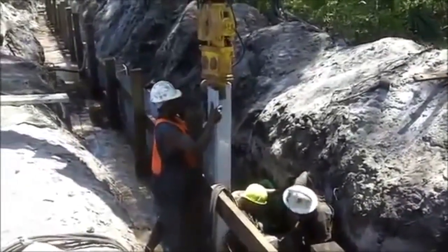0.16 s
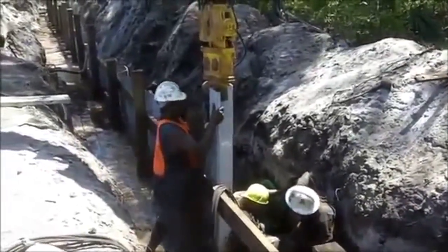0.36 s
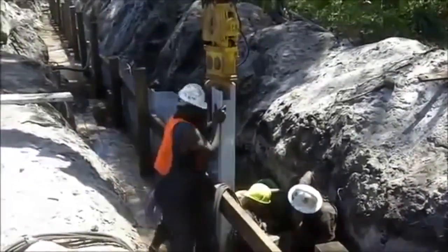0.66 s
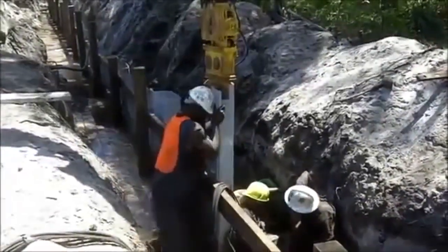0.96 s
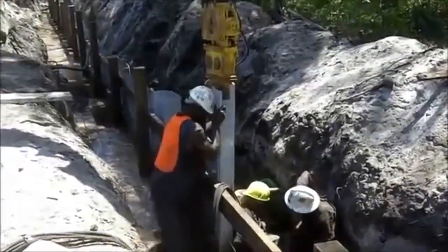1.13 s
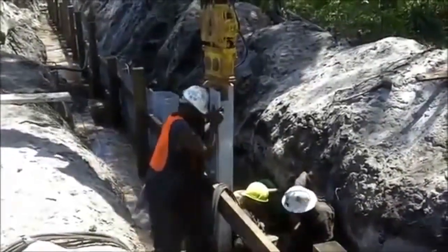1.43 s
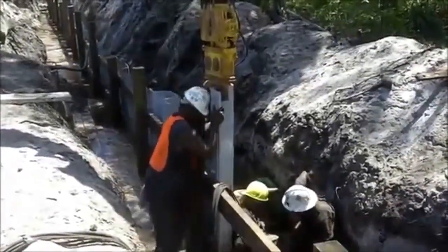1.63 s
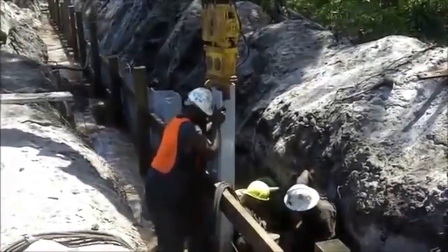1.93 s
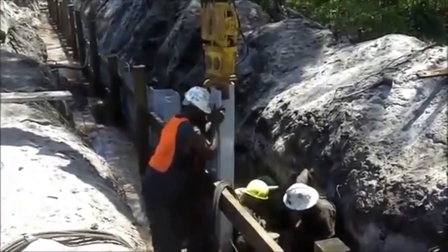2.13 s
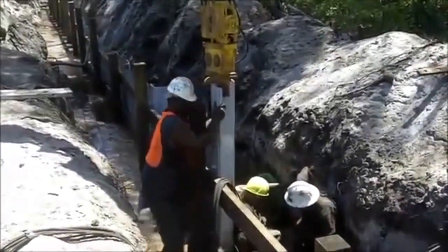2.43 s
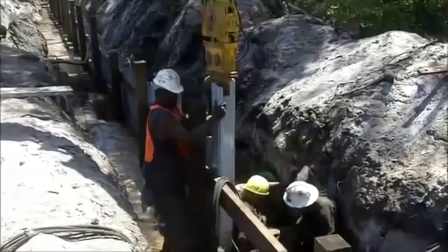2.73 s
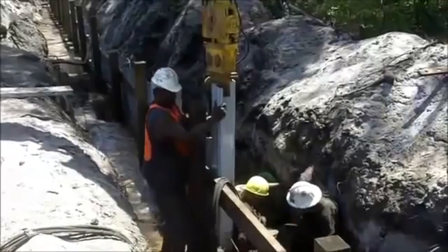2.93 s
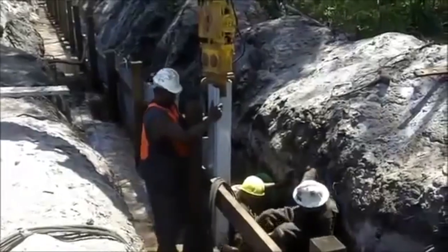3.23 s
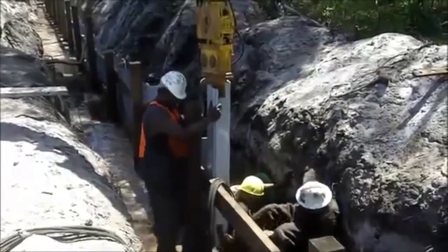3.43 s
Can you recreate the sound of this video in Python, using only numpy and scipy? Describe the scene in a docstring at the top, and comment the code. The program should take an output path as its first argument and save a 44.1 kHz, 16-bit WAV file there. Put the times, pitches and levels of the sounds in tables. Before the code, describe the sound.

A small engine chugs and clatters throughout at an outdoor building site, sagging and surging about twice a second with a louder exhaust bark. A bigger diesel drones steadily behind it with hum and fan roar. Exhaust thumps stand out near 0.7, 1.8 and 3.4 seconds, and a few harder knocks come between 1.9 and 2.6 seconds. Light metal ticks are scattered from about 0.7 to 3.1 seconds.

```python
"""A single-cylinder engine chugs and hunts beside a trench on a building site. About twice a second
it sags, its governor opens the throttle and the exhaust barks louder; piston and valve gear clatter on.
Behind it a bigger diesel drones steadily, with a machine hum, fan roar and a few light metal ticks.
Almost mono: only a faint rumble of air differs between the channels."""
import sys
import numpy as np
from scipy import signal
from scipy.fft import rfft, irfft
from scipy.io import wavfile
from scipy.ndimage import uniform_filter1d

SR = 44100
rng = np.random.default_rng(int(sys.argv[2]) if len(sys.argv) > 2 else 0)


def bounce(signal):
    """Save signal as a 16-bit WAV file at the path given by the first command-line argument."""
    frames = np.transpose(np.atleast_2d(signal))
    limited = np.clip(frames, -1, 1)
    pcm = np.round(limited * 32767).astype(np.int16)
    wavfile.write(sys.argv[1], SR, pcm)


N = 157437

FIRING_HZ, HUNT_DEPTH_HZ, HUNT_HZ, SLOWEST_S = 25.02, 1.48, 1.909, .206
# Spectrum of a piston knock. Each row: frequency in Hz, gain in dB.
KNOCK_SPECTRUM = [(300, -21.5), (520, -0.5), (700, -1.5), (880, 2), (1050, 1.5), (1450, -1.5),
                  (1850, -11.5), (3000, -21.5), (8000, -57)]


def undb(db):
    return 10 ** (np.asarray(db) / 20)


def level(x, db):
    """Set the rms level."""
    return x * undb(db) / np.sqrt(np.mean(x ** 2))


def colour(x, points):
    """Minimum-phase filter through (Hz, dB) points, falling 10 dB an octave outside them."""
    hz, db = np.array(points, float).T
    size = 2 ** 18
    bin_hz = np.maximum(np.arange(size // 2 + 1) * SR / size, 1)
    octaves_out = np.maximum(np.log2(bin_hz / hz[-1]), 0) + np.maximum(np.log2(hz[0] / bin_hz), 0)
    gain_db = np.interp(np.log(bin_hz), np.log(hz), db) - 10 * octaves_out
    cepstrum = irfft(np.log(undb(gain_db)))
    cepstrum[1:size // 2] *= 2
    cepstrum[size // 2 + 1:] = 0
    return irfft(rfft(x, size) * np.exp(rfft(cepstrum)))[:N]


def noise(spectrum):
    return colour(rng.standard_normal(N), spectrum)


def walk(rate_hz):
    """Smooth random drift with unit spread."""
    hold = int(SR / rate_hz)
    steps = np.repeat(rng.standard_normal(400), hold)[:N]
    drift = uniform_filter1d(uniform_filter1d(steps, hold), hold)
    return drift / np.std(drift)


def pulses(cycles, table, scatter_db):
    """Pressure impulses at set places in each engine cycle."""
    out = 0
    for place, _, db in table:
        cycle = (cycles - place + 2).astype(int)
        strength = undb(db + scatter_db * rng.standard_normal(200))
        out = out + np.diff(cycle, prepend=cycle[0]) * strength[cycle]
    return out


def bursts(cycles, table, scatter_db, rise_s=0.003):
    """Decaying noise bursts at set places in each engine cycle."""
    gate = 0
    for place, decay_cycles, db in table:
        since = cycles - place + 2
        strength = undb(db + scatter_db * rng.standard_normal(200))
        gate = gate + strength[since.astype(int)] * np.exp(-(since % 1) / decay_cycles)
    return uniform_filter1d(gate, int(rise_s * SR)) * rng.standard_normal(N)


def throttle(t, open_s=0.015, close_s=0.045, idle_db=-7):
    """Firing strength in dB: the governor opens fast, holds and eases back to idle."""
    # Each row: start in seconds, hold in seconds, strength in dB.
    surges = [(.19, 0.12, 0), (.68, 0.19, 0.5), (1.21, 0.24, 0), (1.72, 0.19, 1.5), (2.3, 0.11, 2.5),
              (2.75, 0.2, 0.5), (3.301, 0.2, 0.5)]
    strength = idle = undb(idle_db)
    for start_s, hold_s, db in surges:
        opening = np.clip((t - start_s) / open_s, 0, 1)
        closing = np.exp(-np.maximum(t - start_s - hold_s, 0) / close_s)
        strength = strength + (undb(db) - idle) * opening * closing
    return 20 * np.log10(strength)


def exhaust(cycles, throttle_db):
    """One pulse a cycle rings pipe and silencer; puffs of gas bark with the throttle."""
    # Pipe resonances and bark spectrum. Each row: frequency in Hz, gain in dB.
    pipe_spectrum = [(14, -16), (25, -7), (34, -27), (47, 3.5), (54, 0), (64, -9), (75, -6.5), (100, -18.5),
                     (127, -8), (160, -22.5), (200, -24.5), (245, -12.5), (315, -15), (430, -36.5),
                     (900, -47.5)]
    bark_spectrum = [(50, -17), (85, -6.5), (125, -2.5), (170, -12), (215, -1), (245, 1.5), (275, -5.5),
                     (320, 1), (348, -11.5), (375, -7), (435, -23.5), (900, -35), (4000, -64)]
    # Each row: place in the cycle (0-1), decay in cycles, gain in dB.
    puffs = [(.57, 0.06, -2), (.9, 0.15, -7), (0.3137, 0.049, -4)]
    firing = pulses(cycles, [(.55, 0, 0)], scatter_db=0.8)
    pipe = colour(firing * undb(0.091 * throttle_db), pipe_spectrum)
    pressure = level(pulses(cycles + 0.013 * walk(60), puffs, scatter_db=3.0), 0)
    turbulence = level(bursts(cycles, puffs, scatter_db=0.3), -1.5)
    bark = colour((pressure + turbulence) * undb(throttle_db), bark_spectrum)
    return level(pipe, -26.5) + level(bark, -30)


def clatter(t, cycles, throttle_db):
    """Piston, valve gear and panels knock and rattle in every cycle."""
    # Impacts. Each row: place in the cycle (0-1), decay in cycles, gain in dB.
    knock_hits = [(0.597, 0.19, 4), (0.476, 0.11, 0), (.13, 0.11, -3), (.29, 0.083, -1)]
    valve_hits = [(0.1, .12, -1), (0.518, 0.072, 0)]
    panel_hits = [(0.358, 0.074, 0.36), (0.548, 0.17, -1.3)]
    # Resonances. Each row: frequency in Hz, gain in dB.
    valve_spectrum = [(700, -13.5), (1200, 0), (1720, 1), (1860, -3), (2000, 2.5), (2170, -7), (2390, 4.5),
                      (2470, 0.5), (2560, 2.5), (2750, -1.5), (2890, -11), (3080, -1.5), (3250, -16.5),
                      (4000, -8), (7000, -32)]
    panel_spectrum = [(1500, -5.5), (2600, -1), (3800, -3), (4800, -11.5), (6700, -7), (8000, -17.5),
                      (10000, -46.5)]
    # Clatter strength. Each row: time in seconds, knock gain in dB.
    swell = [(0, 5), (.17, 0.5), (.4, -2), (.6, 3), (.8, -1), (1.1, -2), (1.4, 0), (1.55, -1), (1.65, 3.5),
             (1.9, 1), (2.05, -2), (2.27, 1.5), (2.36, 0.5), (2.48, 2.5), (2.8, 1.5), (3.0, -2), (3.15, 1),
             (3.55, 0.5)]
    swell_db = np.interp(t, *np.array(swell).T)
    knocks = bursts(cycles, knock_hits, scatter_db=1.0) * undb(swell_db)
    valves = bursts(cycles, valve_hits, scatter_db=1.9) * undb(.6 * swell_db + 0.17 * throttle_db)
    panels = bursts(cycles, panel_hits, scatter_db=2.5) * undb(0.71 * swell_db + 0.5 * throttle_db)
    return (level(colour(knocks, KNOCK_SPECTRUM), -37.5)
            + level(colour(valves, valve_spectrum), -44)
            + level(colour(panels, panel_spectrum), -50.5))


def trench(x, decay_s=0.026, echo_db=-4.5):
    """Add short scattered echoes from the earth banks."""
    t = np.arange(SR // 5) / SR
    tail = rng.standard_normal(len(t)) * np.exp(-t / decay_s) * (t > .004)
    return x + undb(echo_db) * signal.fftconvolve(x, tail / np.linalg.norm(tail))[:N]


def drone(shaft_hz, harmonics, wobble, waver_db):
    """Harmonics of a governed shaft speed, each wavering a little."""
    turns = np.cumsum(shaft_hz * (1 + wobble * walk(9))) / SR
    out = 0
    for multiple, db in harmonics:
        tone = np.sin(2 * np.pi * (multiple * turns + rng.random()))
        out = out + level(tone * undb(waver_db * walk(7.22)), db)
    return out


def steady_machines():
    """The big diesel drones and a second machine hums."""
    # Harmonics. Each row: multiple of shaft speed, level in dB.
    diesel = [(1, -39.5), (2, -32), (3, -43), (5, -37), (6, -47.5), (9, -37), (10, -48.5), (14, -42.5),
              (18, -50), (20, -54), (21, -49.5), (41, -49.5), (90, -69)]
    hum = [(1, -42), (2, -34.5), (12, -53)]
    return (drone(28.26, diesel, wobble=0.001334, waver_db=1.24)
            + drone(55.45, hum, wobble=0.0042, waver_db=0.5))


def roar():
    """Fans and distant plant, slightly restless."""
    # Each row: frequency in Hz, gain in dB.
    roar_spectrum = [(15, -15.5), (23, -7), (32, -14.5), (50, -4), (80, -1), (125, 3.5), (165, -1.5),
                     (230, -5.5), (310, -6), (430, -9.5), (620, -12.5), (880, -9), (1100, -13.5),
                     (1450, -14), (1900, -19.5), (2600, -21), (3400, -25.5), (4700, -35.5), (6700, -36),
                     (8200, -44.5), (10000, -52.5)]
    return level(noise(roar_spectrum) * undb(0.087 * walk(3.1) + 1.25 * walk(18)), -29)


def cooling_fan(t, swell_db=5.5, lag_s=0.064, rise_db_per_s=1.0):
    """The small engine's fan whirrs loudest just after each speed peak and slowly grows."""
    # Each row: frequency in Hz, gain in dB.
    whirr_spectrum = [(600, -17), (780, -3), (860, -2.5), (910, -5), (980, -1.5), (1060, 0), (1115, -14),
                      (1330, -6.5), (1700, -24)]
    speed_swing = -np.cos(2 * np.pi * HUNT_HZ * (t - lag_s - SLOWEST_S))
    return level(noise(whirr_spectrum) * undb(swell_db * speed_swing + rise_db_per_s * t), -41)


def breeze():
    """Faint rumble of air, independent in each channel."""
    spectrum_hz_db = [(15, -1), (50, 13), (100, -21), (300, -46), (1000, -54)]
    return np.array([level(noise(spectrum_hz_db), -50.5) for _ in range(2)])


def thumps():
    """Hard firings ring the silencer body and boom in the pipe."""
    # Each row: start in seconds, body peak in dB, boom peak in dB.
    firings = [(.095, -23, -15.5), (.699, -8, -21), (0.742, -14, -20), (.757, -14, -29), (1.299, -16, -20),
               (1.783, -11, -28), (2.257, -24, -19.5), (2.344, -15.5, -25), (2.379, -21, -20),
               (3.376, -13, -15)]
    # Resonances. Each row: frequency in Hz, gain in dB.
    body_spectrum = [(25, -11), (70, 2.5), (120, -2.5), (170, -4), (245, -0.5), (280, -5.5), (320, -1.5),
                     (430, -17), (900, -34), (4000, -70)]
    boom_spectrum = [(22, -10), (40, -4), (56, -1), (72, -4.5), (110, -15.5), (300, -48.5)]
    body = colour(signal.unit_impulse(N), body_spectrum)
    boom = colour(signal.unit_impulse(N), boom_spectrum)
    out = np.zeros(N)
    for start_s, body_db, boom_db in firings:
        start = int(start_s * SR)
        thump = undb(body_db) * body / np.abs(body).max() + undb(boom_db) * boom / np.abs(boom).max()
        out[start:] += thump[:N - start]
    return out


def strikes(t, hits, spectrum, decay_s):
    """Metal hits metal: sudden noise that dies away."""
    gate = sum(undb(db) * (t >= at_s) * np.exp(-np.abs(t - at_s) / decay_s) for at_s, db in hits)
    return gate * level(noise(spectrum), 0)


def metal_ticks(t):
    """Light, bright contacts of metal parts."""
    # Each row: start in seconds, level in dB.
    ticks = [(0.731, -42), (0.776, -41), (0.819, -46), (1.575, -44), (2.341, -42), (2.377, -40.5),
             (2.775, -48), (2.893, -45.5), (3.135, -44)]
    # Each row: frequency in Hz, gain in dB.
    tick_spectrum = [(1200, -13), (2700, 5), (4200, 11), (6600, 8.5), (8200, 2.5), (10000, -51)]
    return strikes(t, ticks, tick_spectrum, decay_s=0.016)


def hard_knocks(t):
    """The piston knocks hard a few times."""
    # Each row: start in seconds, level in dB.
    knocks = [(1.868, -32), (2.344, -25.5), (2.379, -32), (2.581, -29.5)]
    return strikes(t, knocks, KNOCK_SPECTRUM, decay_s=0.0096)


def scene():
    t = np.arange(N) / SR
    firing_hz = FIRING_HZ - HUNT_DEPTH_HZ * np.cos(2 * np.pi * HUNT_HZ * (t - SLOWEST_S))
    cycles = np.cumsum(firing_hz) / SR
    throttle_db = throttle(t)
    gas = exhaust(cycles, throttle_db) + thumps()
    metal = clatter(t, cycles, throttle_db) + metal_ticks(t) + hard_knocks(t)
    return gas + steady_machines() + roar() + cooling_fan(t) + trench(metal) + breeze()


def record(dry):
    """Notch the treble deeply and cut the top."""
    notch_hz, top_hz = (5080, 6050), 10100
    notched = signal.sosfilt(signal.butter(7, notch_hz, "bandstop", fs=SR, output="sos"), dry)
    return signal.sosfilt(signal.ellip(8, .2, 70, top_hz, fs=SR, output="sos"), notched)


dry = scene()
out = record(dry)
bounce(out)
```